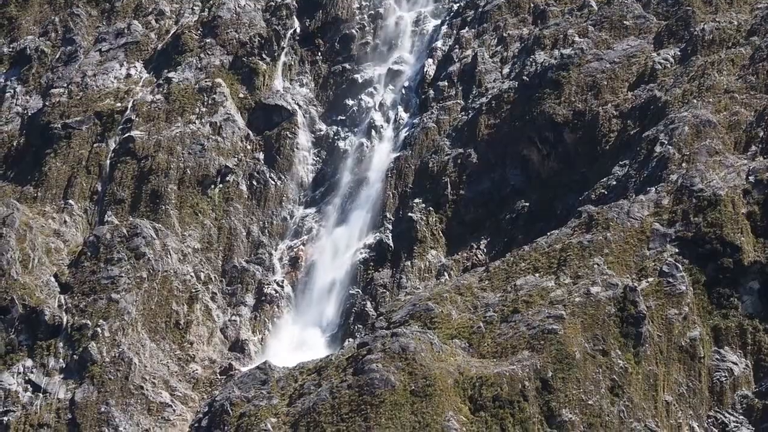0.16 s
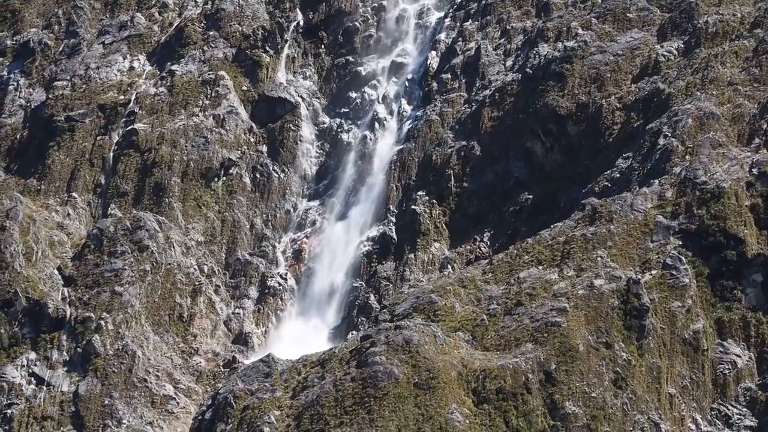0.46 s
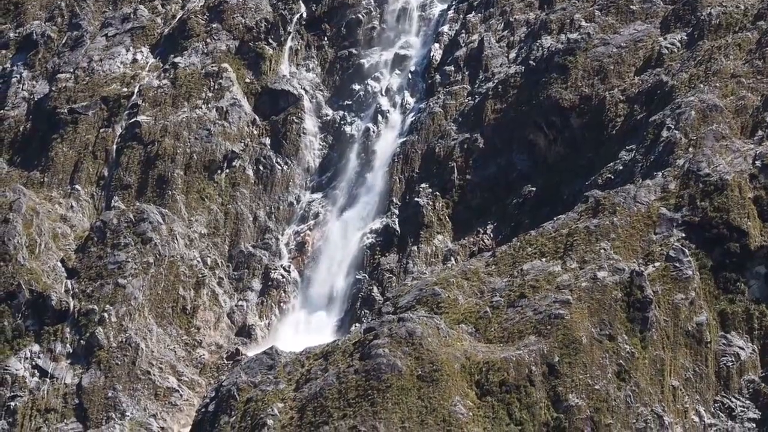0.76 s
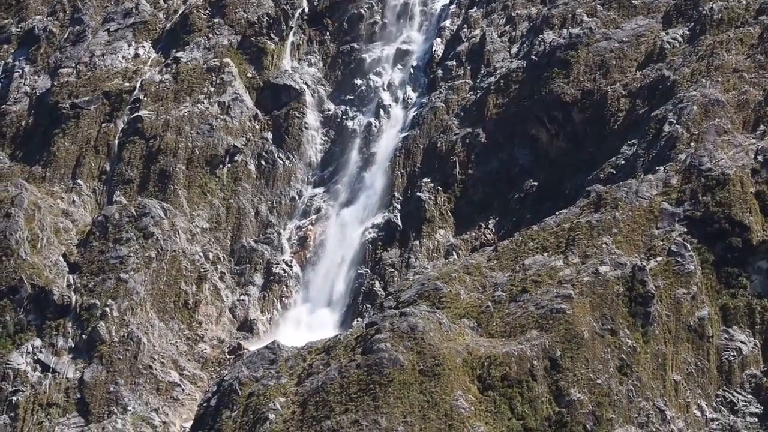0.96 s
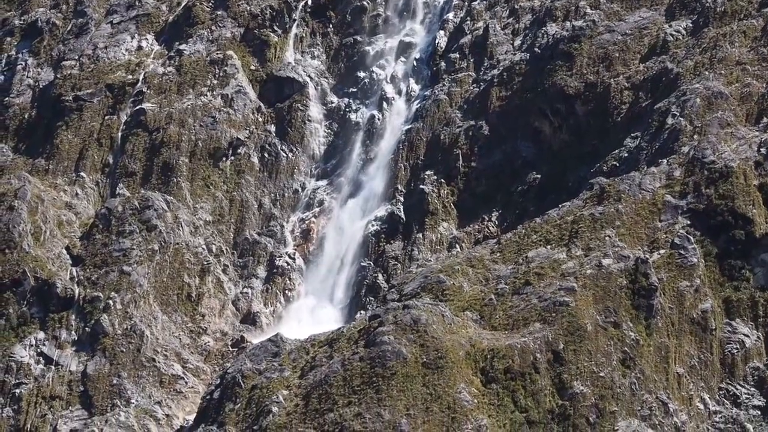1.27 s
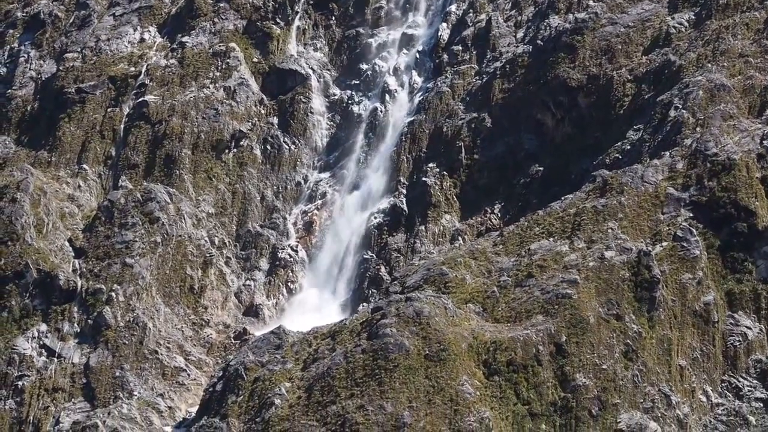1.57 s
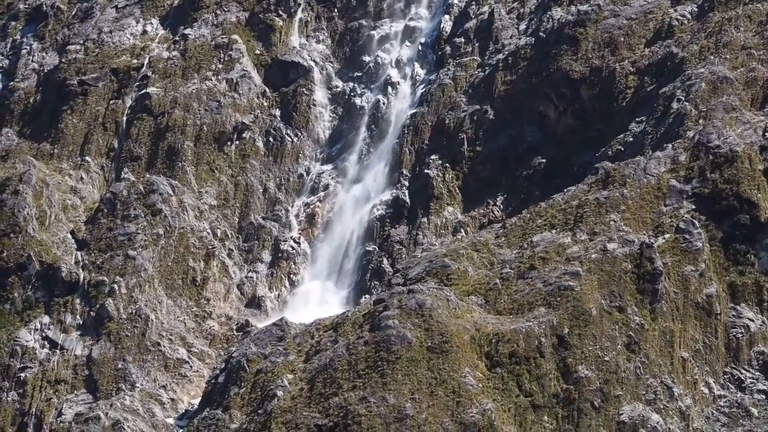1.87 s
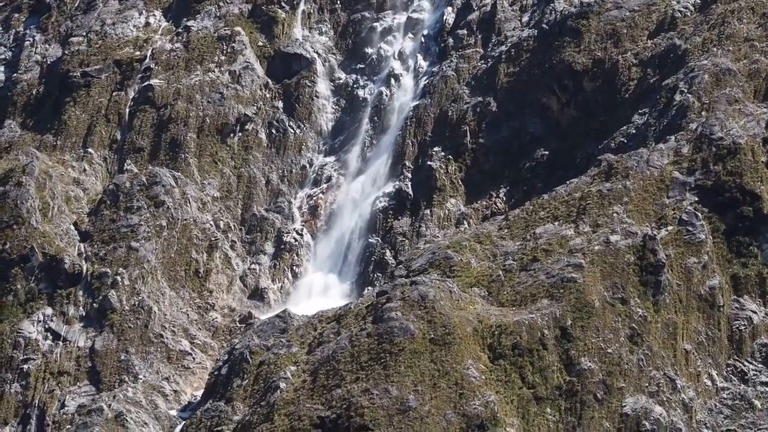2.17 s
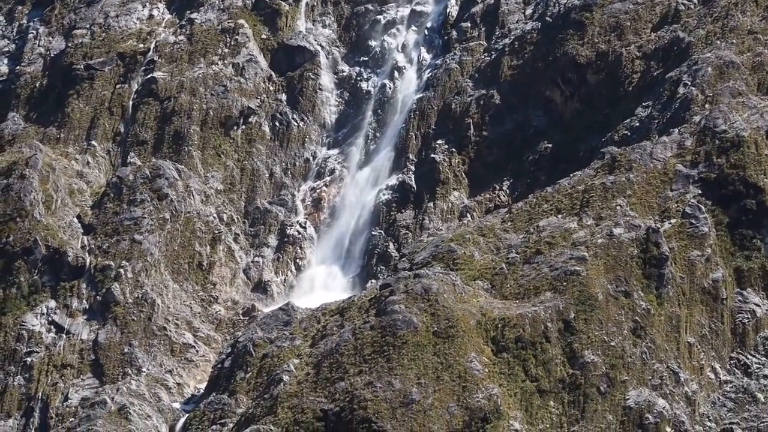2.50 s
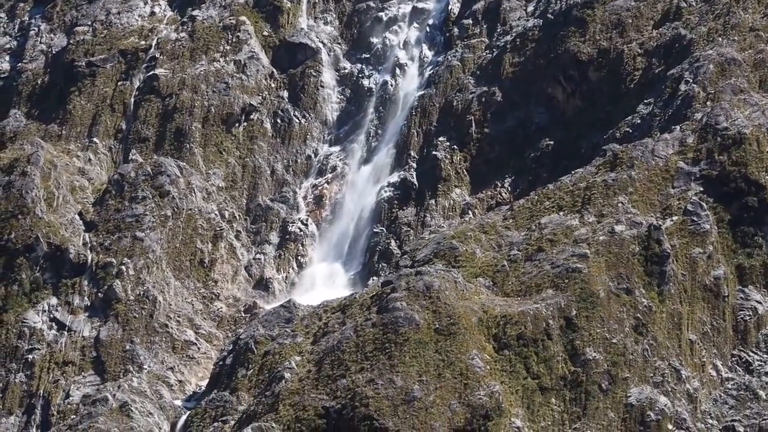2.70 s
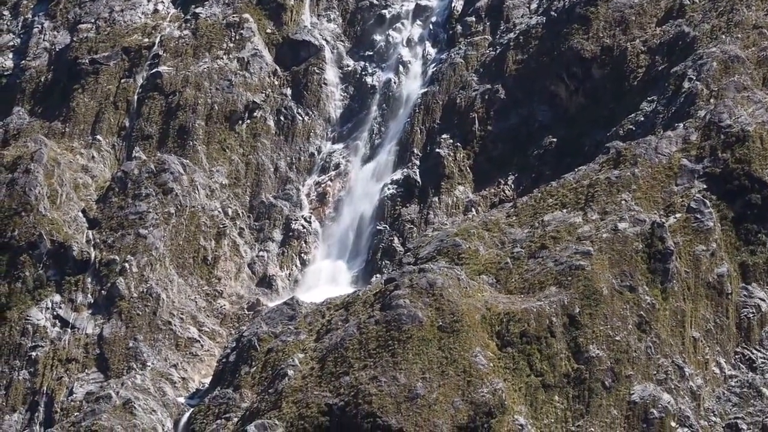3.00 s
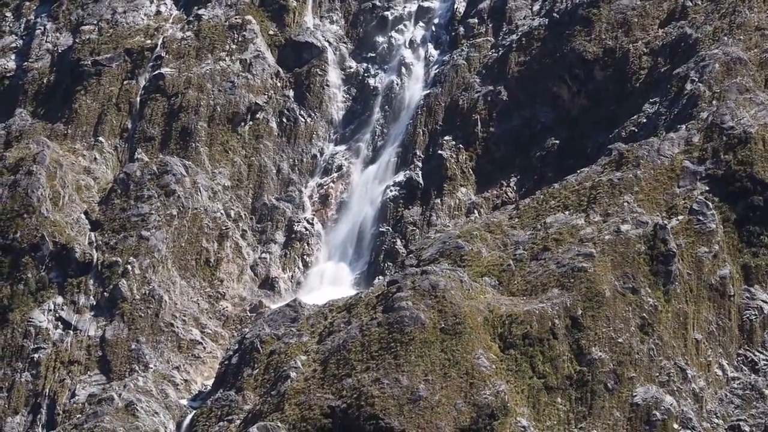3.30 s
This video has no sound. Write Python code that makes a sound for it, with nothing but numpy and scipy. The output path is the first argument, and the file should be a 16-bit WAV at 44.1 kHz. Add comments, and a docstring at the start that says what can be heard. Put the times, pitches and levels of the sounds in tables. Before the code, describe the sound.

Wind rumbles and slams against the microphone while a waterfall rushes in the distance.

```python
"""A waterfall roars across a rocky valley from the start, with faint dry ticks close by. From about 0.8 s,
gusts buffet the two ports of a small microphone, mostly the right one: a lumpy rumble that brightens as it
grows, broken by slams of pressure, with a sharp click at each slam. On the hardest hits the limiter ducks the
whole scene and lets it swell back. The slams peak near 2.8 s, and the wind blows on to the end."""
import sys
import numpy as np
from scipy import signal
from scipy.io import wavfile
from scipy.ndimage import minimum_filter1d

SR = 44100
rng = np.random.default_rng(int(sys.argv[2]) if len(sys.argv) > 2 else 0)


def digitize_waveform(pressure):
    """Quantize a signal to 16-bit integers and store it at the path in sys.argv[1].

    Rows of a 2-D input are taken as channels; values are limited to [-1, 1].
    """
    field = np.atleast_2d(pressure).T
    bounded = np.clip(field, -1, 1)
    quanta = np.round(bounded * 32767).astype(np.int16)
    wavfile.write(sys.argv[1], SR, quanta)


N = 152145
T = np.arange(N) / SR


def amp(db):
    """Decibels to gain."""
    return 10 ** (np.asarray(db) / 20)


def unit_rms(x):
    """Scale to unit rms."""
    return x / np.sqrt(np.mean(x ** 2) + 1e-20)


def at_hz(table, hz):
    """Columns of a frequency table at one frequency."""
    freq_hz, *columns = np.transpose(table)
    return [np.interp(np.log(hz), np.log(freq_hz), column) for column in columns]


def drift(rate_hz):
    """Slow random wander with a spread of 1."""
    step, settle = 40, 2000
    pole = np.exp(-2 * np.pi * rate_hz * step / SR)
    white = rng.standard_normal(N // step + settle + 2)
    slow = signal.lfilter([1], [1, -2 * pole, pole * pole], white)[settle:]
    return np.interp(np.arange(N) / step, np.arange(len(slow)), unit_rms(slow))


def noise_bands(top_hz):
    """Yield each third-octave band's centre frequency and a pair of unrelated noises in it."""
    edges_hz = 22 * 2 ** np.arange(0, 9.6, 1 / 3)
    white = rng.standard_normal((2, 2, N))
    for k, (low, high) in enumerate(zip(edges_hz, edges_hz[1:])):
        if low < top_hz:
            bandpass = signal.butter(2, [low, high], "band", fs=SR, output="sos")
            yield np.sqrt(low * high), signal.sosfilt(bandpass, white[k % 2])


def wind_buffet():
    """Turbulence at each port: its own lumpy rumble, brighter and thinner as gusts and puffs rise."""
    # gust envelope at the ports: time_s, left_db, right_db
    gusts = [(0, -59, -84.5), (.7, -47.5, -41), (.82, -26.5, -32), (.95, -38.5, -41), (1.02, -61, -41.5),
             (1.07, -54, -18), (1.13, -26.5, -21.5), (1.17, -36, -12.5), (1.3, -45, -23), (1.38, -28, -5.5),
             (1.40, -33, -21.5), (1.44, -36, -20), (1.48, -35, -17.5), (1.55, -51, -20.5),
             (1.63, -44.5, -22.5), (1.752, -56.5, -24.5), (1.8, -32.5, -14.5), (2.0, -37.5, -14.5),
             (2.051, -33.5, -12.5), (2.22, -39, -19), (2.27, -42.5, -28.5), (2.39, -43.5, -41.5),
             (2.45, -29, -14.5), (2.51, -30.5, -25), (2.55, -43.5, -33.5), (2.61, -37, -34),
             (2.649, -34.5, -15), (2.82, -35.5, -12), (2.931, -24.5, -33), (3.0, -32, -27),
             (3.08, -49, -38), (3.2, -59, -28.5), (3.28, -29, -40), (3.348, -42, -25), (3.409, -43.5, -19),
             (3.45, -17.5, -27)]
    # short puffs on the right port: centre_s, level_db, half_length_s
    puffs = [(0.045, -34.5, 0.033), (0.784, -22.5, 0.019), (0.912, -22, 0.013), (1.14, -19, 0.0092),
             (1.2, -12, 0.0041), (1.24, -10.5, 0.0054), (1.338, -11, 0.0087), (1.197, -21.5, 0.005),
             (1.281, -9, 0.0057), (1.383, -18.5, 0.027), (1.43, -12.5, 0.012), (1.496, -18, 0.021),
             (1.518, -17.5, 0.023), (1.591, -14.5, 0.014), (1.693, -14, 0.0076), (1.822, -29, 0.013),
             (1.855, -10.5, 0.026), (1.89, -11, 0.0084), (1.91, -9.5, 0.003), (1.941, -11.5, 0.0041),
             (1.97, -10, 0.0089), (2, -8, 0.0039), (2.021, -11.5, 0.0091), (2.077, -11.5, 0.0097),
             (2.118, -11.5, 0.013), (2.162, -23.5, 0.0088), (2.227, -14, 0.0072), (2.333, -29, 0.032),
             (2.358, -27, 0.036), (2.422, -24, 0.025), (2.45, -20.5, 0.0055), (2.721, -7.5, 0.011),
             (2.763, -9.5, 0.0059), (2.79, -17, 0.0058), (2.842, -7.5, 0.013), (2.888, -10, 0.0079),
             (2.941, -12, 0.021), (3.03, -21, 0.014), (3.143, -15, .015), (3.208, -25, 0.015),
             (3.347, -15.5, 0.0036), (3.384, -13, 0.0066)]
    # tone of the rumble: freq_hz, relative_density_db
    colour = [(25, -33.5), (48, -15), (68, -8), (95, -3.5), (135, 1), (200, 1), (270, -3.5), (380, -2),
              (540, -15.5), (760, -16), (1100, -41.5), (1500, -51.5), (2200, -39.5)]
    usual_db, lump_db, lump_hz, top_hz = -10.5, 2.5, 10.1, 1390
    brighten, thin = 0.85, 0.18  # dB per octave for each dB of wind over the usual
    time_s, left_db, right_db = np.transpose(gusts)
    puff_power = sum(amp(2 * db) * np.exp(-((T - at) / half) ** 2) for at, db, half in puffs)
    right_power = amp(2 * np.interp(T, time_s, right_db)) + puff_power
    level = np.array([amp(np.interp(T, time_s, left_db)), np.sqrt(right_power)])
    over_db = 20 * np.log10(level) - usual_db
    port_lumps = np.array([drift(lump_hz), drift(lump_hz)])
    rumble = 0
    for hz, pair in noise_bands(2200):
        shelter_db = np.array([[-4.5 * np.log2(hz / 100)], [0]])  # the sheltered left port is duller
        tilt = brighten * max(np.log2(hz / 250), 0) + thin * min(np.log2(hz / 120), 0)
        lumps = 0.31 * port_lumps + drift(lump_hz / 2)
        rumble += pair * amp(at_hz(colour, hz)[0] + shelter_db + tilt * over_db + lump_db * lumps)
    left, right = signal.sosfilt(signal.butter(4, top_hz, fs=SR, output="sos"), rumble)
    return level * [unit_rms(left), unit_rms(right)]


def wind_slams():
    """Short, hard pressure swings on the right port, with a sharp click laid in at each slam."""
    # single slams: centre_s, peak_db, swing_hz, click_db
    slams = [(0.773, -4.5, 292, -21), (1.138, -8.5, 280, -50), (1.147, -6.5, 463, -41),
             (1.152, -2, 560, -23.5), (1.196, -5, 215, -49), (1.21, -3, 300, -57), (1.243, -11, 200, -47),
             (1.28, -5, 253, -25), (1.327, -3.5, 330, -52), (1.334, -3.5, 380, -43), (1.343, -2, 326, -64),
             (1.362, -6, 330, -31), (1.375, -1.5, 380, -15), (1.419, -2.5, 392, -55), (1.49, -3, 207, -27),
             (1.521, -3.5, 293, -49), (1.577, -3, 169, -36), (1.785, -7, 300, -27.5), (1.808, -2, 267, -27),
             (1.857, -11, 357, -31), (1.965, -5, 332, -52), (2.065, -4.5, 300, -57),
             (2.143, -2.5, 284, -38), (2.416, -20.5, 297, -63), (2.45, -11, 289, -26.5),
             (2.638, -7, 278, -44), (2.674, -12, 300, -29), (2.7007, -5, 297, -23.5),
             (2.7141, -3.5, 306, -20), (2.7773, 4, 280, -23), (2.785, -2, 302, -34), (2.826, 2, 287, -51),
             (2.831, -2, 301, -16), (2.842, -3, 220, -57), (2.86, -1, 257, -52), (2.899, -1.5, 180, -54),
             (2.907, 0, 317, -37), (2.939, -6.5, 248, -27.5), (3.373, -10, 208, -54)]
    width_rad, click_rise_s, click_decay_s = 2.6, .00004, .00015
    bell_at_crest = np.exp(-(np.pi / 2 / width_rad) ** 2 / 2)
    out = np.zeros((2, N))
    for centre_s, peak_db, swing_hz, click_db in slams:
        phase = 2 * np.pi * swing_hz * (T - centre_s)
        bell = np.exp(-(phase / width_rad) ** 2 / 2) / bell_at_crest
        swing = amp(peak_db) * bell * np.sin(phase)
        age_s = np.maximum(T - centre_s, 0)
        click = 2 * amp(click_db) * np.exp(-age_s / click_decay_s) * (1 - np.exp(-age_s / click_rise_s))
        out[1] += rng.choice([-1, 1]) * (swing - click)
    return out


def waterfall():
    """Distant roar of falling water: smooth noise, centred in the low mids and mostly diffuse on top."""
    # tone and stereo image of the roar: freq_hz, relative_density_db, correlation, left_minus_right_db
    spectrum = [(30, -11, 0.35, 1), (59, -14, 0.65, -1.5), (91, -12, 0.95, -11), (165, -4, .88, 0),
                (246.5, 3.5, 1, 1.5), (330, -2.5, 1, 3.5), (497, 0, 0.91, 0.5), (665, -3.5, 1, 2.5),
                (975, -1, 1, 1.5), (1205, -8, .7, 4.5), (1516, -10.5, 1, -1.5), (2280, -23.5, -0.34, -4.5),
                (2920, -48, 0.34, -17), (4200, -33.5, 0.93, -1.5), (5000, -38.5, 0.13, 2),
                (6070, -42, -0.66, 6), (7000, -41, -0.23, 2.5), (8200, -41, 0.084, -1),
                (9800, -44, -0.25, -2.5), (15300, -56.5, -0.56, 1)]
    # the roar swells and fades as the wind carries it: time_s, gain_db
    carry = [(0, -4), (.1, 0.5), (.3, -0.5), (.6, -1), (.8, 0), (1.05, -0.5), (1.4, 1), (1.75, 0.5),
             (2.1, 3.5), (2.4, -1), (2.6, -2), (3.0, -1), (3.3, 0.5), (3.45, -1)]
    base_db, flicker_db = -34, 0.25
    opposed = np.array([[1], [-1]])
    roar, shared_flicker = 0, drift(11.0)
    for hz, (mid, side) in noise_bands(SR / 2):
        density_db, correlation, balance_db = at_hz(spectrum, hz)
        flicker = 1.1 * shared_flicker + drift(18.0)
        gain = amp(density_db + flicker_db * flicker + opposed * balance_db / 2)
        roar += gain * (np.sqrt(1 + correlation) * mid + np.sqrt(1 - correlation) * side * opposed)
    return amp(base_db + np.interp(T, *np.transpose(carry))) * unit_rms(roar)


def dry_ticks():
    """Tiny close ticks over a fainter sprinkle, each ringing briefly at six treble pitches."""
    # the ticks that stand out: start_s, level_db, low_pitch_hz, high_pitch_hz
    accents = [(.013, -38, 5500, 7500), (.098, -39, 7500, 9200), (.082, -51.5, 8900, 10200),
               (.112, -48, 7000, 9000), (.155, -40, 6800, 8200), (.209, -27, 5500, 9340),
               (.22, -44, 7700, 9000), (.281, -43, 6000, 11000), (.399, -38, 5600, 6800),
               (.408, -38.5, 5300, 9500), (.482, -29.5, 5500, 9000), (.495, -33, 5500, 6800),
               (.575, -48, 6500, 8500), (.639, -40, 8000, 10000), (.683, -48, 9500, 10800),
               (.933, -35.5, 6500, 8500), (.965, -46, 10000, 11200), (1.207, -29.5, 3800, 4800),
               (1.212, -27, 5300, 6600), (1.222, -30, 5300, 6800), (1.268, -40, 4920, 8500),
               (1.443, -38.5, 7000, 8500), (1.518, -41, 7500, 8500), (1.632, -46, 7500, 9500),
               (1.73, -45, 6200, 7200), (1.748, -49, 6200, 7200), (1.886, -34, 6000, 8000),
               (2.087, -34, 6200, 7500), (2.48, -47, 6000, 8000), (2.853, -42, 8000, 8800),
               (3.12, -36, 2600, 3300), (3.322, -44, 7000, 7800), (3.36, -32.5, 5500, 9000)]
    rise_s, t60_s = .0003, .012
    sprinkle_count, sprinkle_per_s, low_share = 276, 90, .3
    sprinkle = []
    for when, chance, tone, spread in rng.random((sprinkle_count, 4)):
        level_db = -53 + 4 * min(-np.log(chance), 3)
        low_hz, high_hz = 5200 + 2200 * tone, 7000 + 2500 * spread
        if tone < low_share:  # some ring about an octave and a half lower
            level_db, low_hz, high_hz = level_db + 1, low_hz / 2.7, high_hz / 2.7
        sprinkle.append((when * sprinkle_count / sprinkle_per_s, level_db, low_hz, high_hz))
    out, t = np.zeros(N + SR), np.arange(SR // 50) / SR
    envelope = (1 - np.exp(-t / rise_s)) ** 2 * amp(-60 * t / t60_s)
    for start_s, level_db, low_hz, high_hz in list(accents) + sprinkle:
        pitch_hz = np.linspace(low_hz, high_hz, 6)[:, None] * rng.uniform(.96, 1.04, (6, 1))
        partials = low_hz / pitch_hz * np.sin(2 * np.pi * pitch_hz * (t + 1))  # + 1 scatters the phases
        start = int(start_s * SR)
        out[start:start + len(t)] += amp(level_db) * envelope * partials.sum(axis=0) / 3
    return out[:N] * amp([[-2.5], [0]])  # a little to the right


def scene():
    """Waterfall and ticks arrive from outside, later on the left; buffet and slams arise at the ports."""
    port_lag_s = .00009
    left, right = waterfall() + dry_ticks()
    outside = np.array([np.roll(left, round(port_lag_s * SR)), right])
    return outside + wind_buffet() + wind_slams()


def record(dry):
    """A stereo-linked limiter ducks almost at once, holds and climbs back; soft clip and high cut follow."""
    ceiling_db, release_db_per_s, cutoff_hz = -13.5, 54.5, 16000
    attack_s, hold_s = .000065, .005
    over_db = np.maximum(20 * np.log10(np.abs(dry).max(axis=0) + 1e-9) - ceiling_db, 0)
    climb_db = release_db_per_s * T
    release_db = np.interp(T - hold_s, T, np.maximum.accumulate(over_db + climb_db) - climb_db)
    half_hold = int(hold_s * SR) // 2
    hold_db = np.roll(-minimum_filter1d(-over_db, size=2 * half_hold + 1), half_hold)
    pole = np.exp(-1 / (attack_s * SR))
    duck_db = signal.lfilter([1 - pole], [1, -pole], np.maximum(release_db, hold_db))
    drive = dry * amp(-duck_db) / amp(ceiling_db + 1.5)
    rounded = amp(ceiling_db + 1) * drive / (1 + np.abs(drive) ** 6) ** (1 / 6)
    return signal.sosfilt(signal.cheby2(12, 70, cutoff_hz, fs=SR, output="sos"), rounded)


dry = scene()
out = record(dry)
digitize_waveform(out)
```